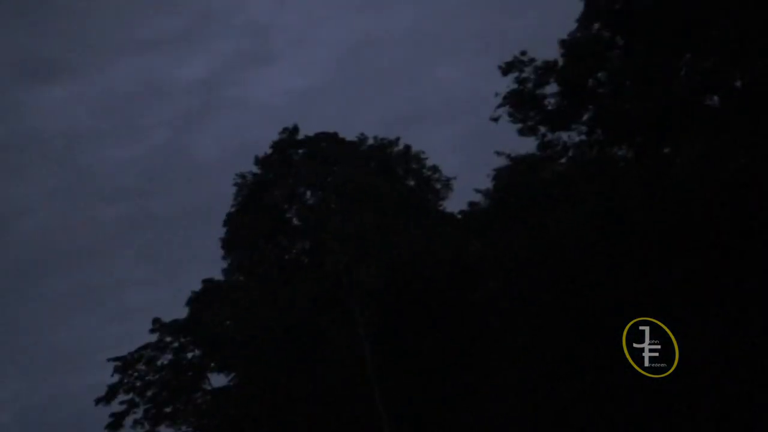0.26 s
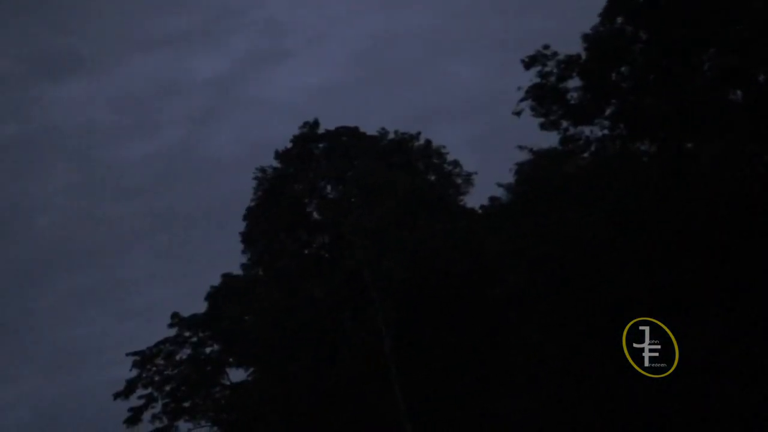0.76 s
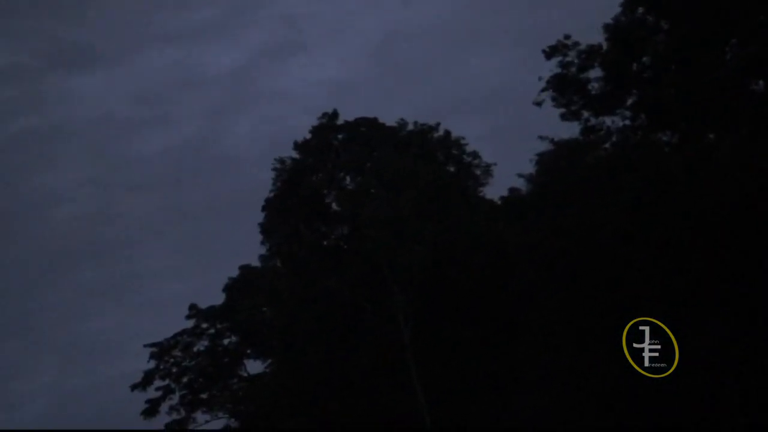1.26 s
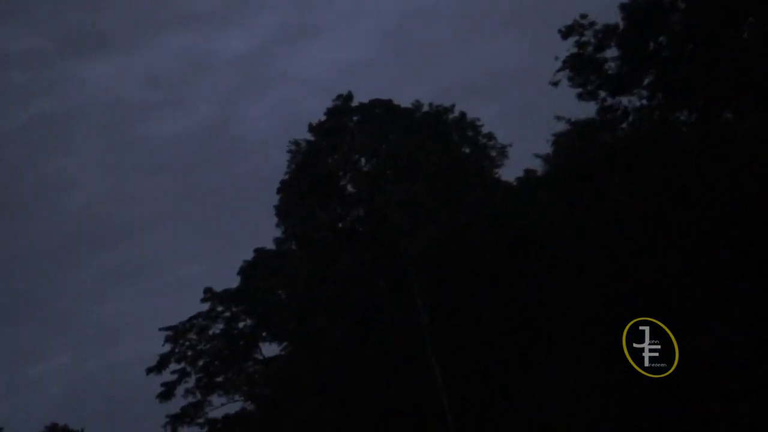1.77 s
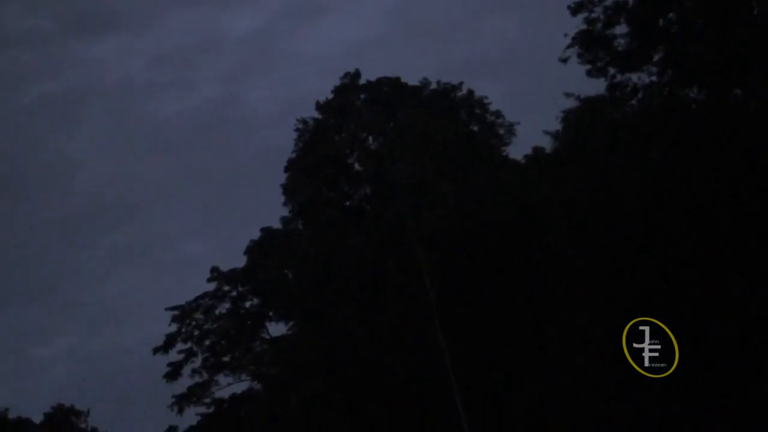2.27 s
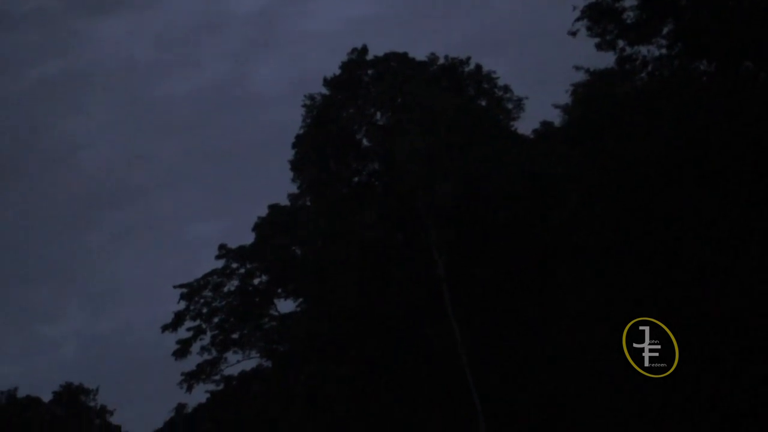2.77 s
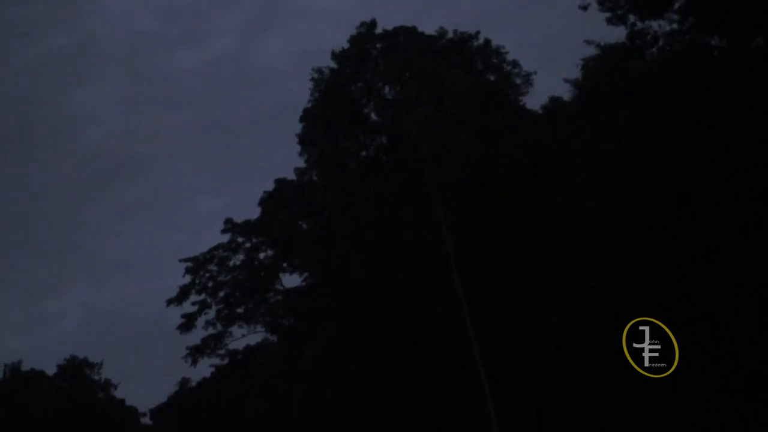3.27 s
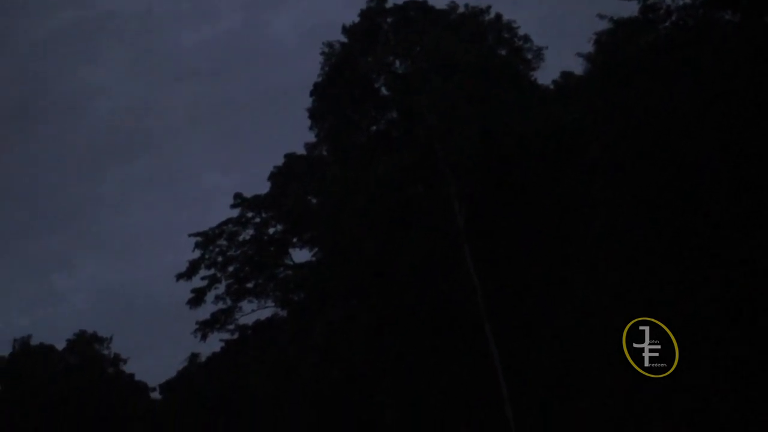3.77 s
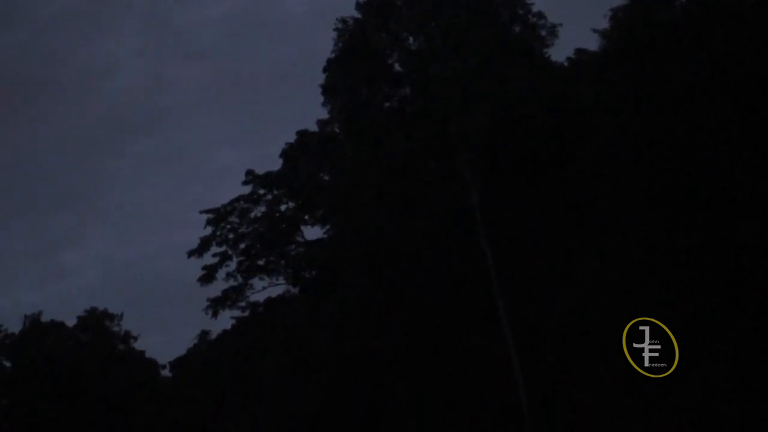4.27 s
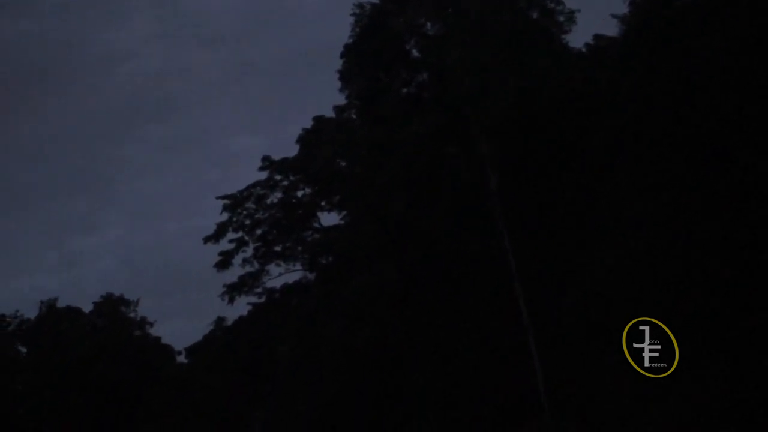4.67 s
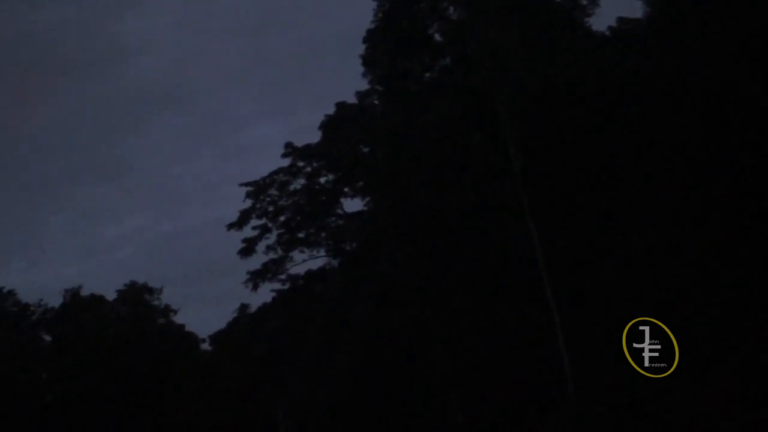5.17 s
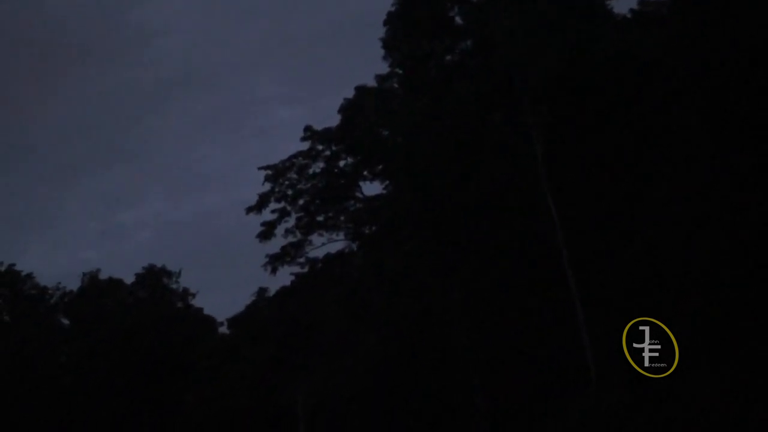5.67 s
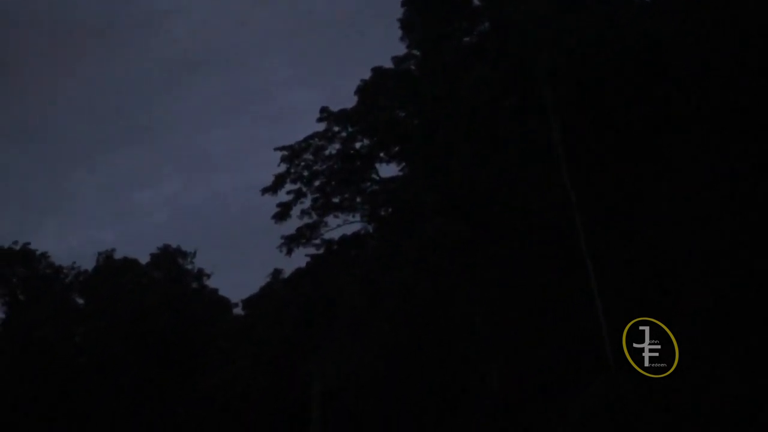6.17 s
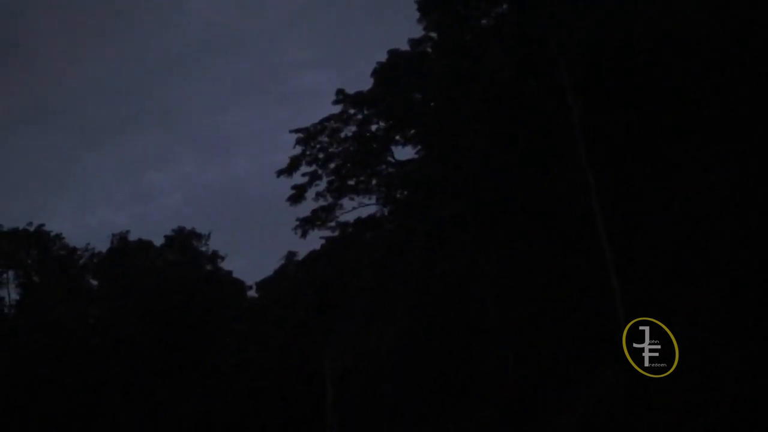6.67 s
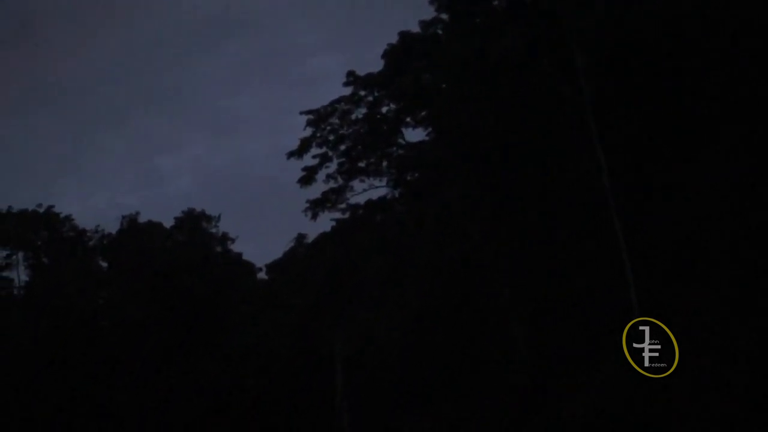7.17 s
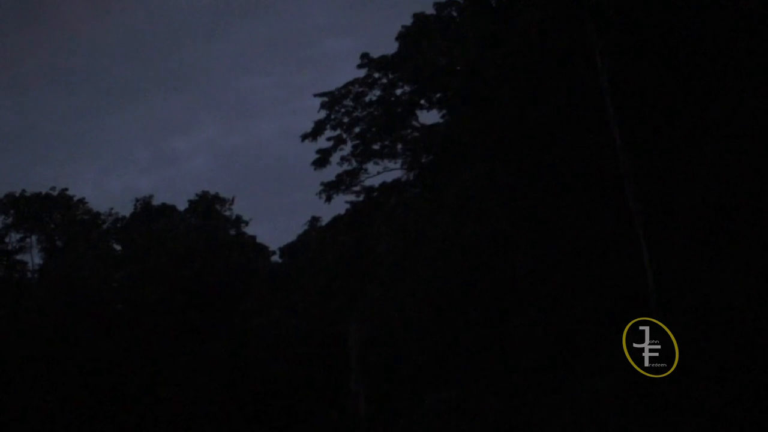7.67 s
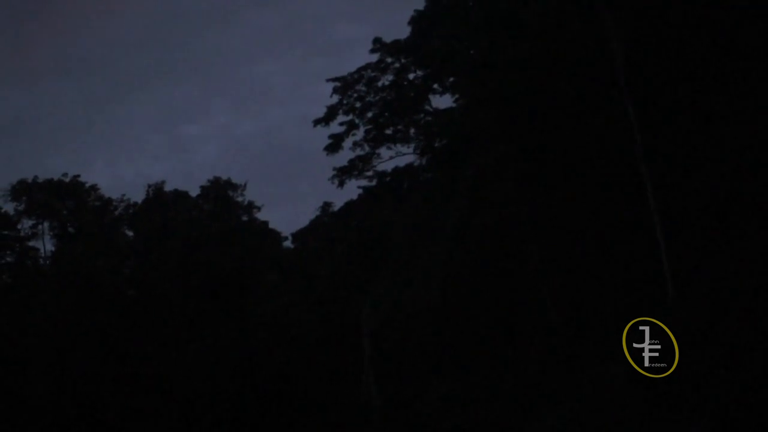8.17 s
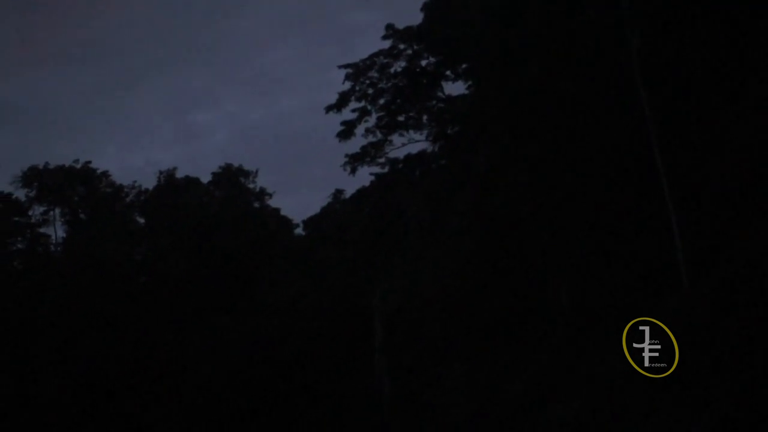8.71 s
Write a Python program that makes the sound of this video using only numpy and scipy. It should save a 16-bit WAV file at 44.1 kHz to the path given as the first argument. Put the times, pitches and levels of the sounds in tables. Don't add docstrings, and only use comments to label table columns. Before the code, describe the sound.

Far-off hoarse howling fades and barks twice in dark forest, while crickets and katydids trill ever nearer and drops tick on wet leaves.

```python
import sys
import numpy as np
from scipy import signal
from scipy.fft import rfft, irfft
from scipy.io import wavfile
from scipy.ndimage import uniform_filter1d

SR = 44100
rng = np.random.default_rng(int(sys.argv[2]) if len(sys.argv) > 2 else 0)


def bounce(signal):
    frames = np.transpose(np.atleast_2d(signal))
    limited = np.clip(frames, -1, 1)
    pcm = np.round(limited * 32767).astype(np.int16)
    wavfile.write(sys.argv[1], SR, pcm)


def boost_factor(decibels):
    exponent = np.asarray(decibels, float) / 20
    return 10 ** exponent


N = 394254
TIME = np.arange(N) / SR
FREQ = np.maximum(np.fft.rfftfreq(N, 1 / SR), 1)
FAR_ENDS_S = 6.21

# start_s, effort_db, opening_0_to_1, held_voice_above_effort_db
ROAR = [
    (0, -33, 0.56, -2.5),
    (.24, -31.5, 0.62, -5),
    (.5, -28, 0.63, -15.5),
    (.88, -27, 0.67, -4),
    (.97, -29, 0.3, -12.5),
    (1.32, -34, 0.34, -4.5),
    (1.38, -35.5, 0.46, -3.5),
    (1.65, -38.5, 0.27, -5.5),
    (2.2, -56, 0.4, 3.5),
]
# multiple, level_db
VOICE_ORDERS = [(1, 0), (2, -4), (3, -13), (4, -20), (5, -19)]
# pitch_hz, width_hz, level_db
HOARSE_THROAT = [(378, 146, -16.5), (683, 175, -8), (888, 88, -3), (1374, 260, -15.5)]
# pitch_hz, width_hz, level_db
BRIGHT_THROAT = [(1357, 31, 0), (1620, 380, -4), (1830, 35, -6), (1940, 200, -22), (2334, 140, 2.5)]
# pitch_hz, width_hz
MOUTHS = (1082, 50), (770, 50)
# start_s, length_s, level_db, pitch_hz, width_hz
JOINERS = [
    (.82, .52, -48, 1420, 180),
    (0.72, 0.58, -44, 770, 45),
    (1.38, 0.27, -53.5, 1965, 72),
    (1.47, 0.36, -64, 1360, 58),
    (.68, 0.32, -56, 2330, 60),
    (.45, 0.4, -53, 980, 69),
]
# start_s, length_s, level_db
CHEST = (0, 1.77, -60)
# pitch_hz, level_db_per_hz
MURMUR = [(15, -66.5), (25, -28), (146, -8.5), (280, 0), (316, -3.5), (493, -1.5), (626, -6), (756, -4.5),
          (1500, -15), (1950, -41), (3300, -120)]
# pitch_hz, level_db_per_hz
HISS = [(1000, -4.5), (2000, 2), (3000, -7), (4100, 3.5), (4800, -15.5), (7000, 9), (7900, 3.5),
        (8300, -11), (15500, -14)]
# pitch_hz, level_db_per_hz
BED = [(30, -26.5), (70, -21.5), (130, -20), (1200, -7.5), (1900, -5.5), (4100, -2), (5000, 5.5),
       (7000, 5.5), (7650, -18), (11000, -12), (15500, -19.5)]
# pitch_hz, likeness_-1_to_1
LIKENESS = [(60, -0.072), (180, -0.22), (550, -0.036), (1650, -0.15), (4970, 0.22), (15000, 0.26)]
# start_s, length_s, level_db
LULL = (6.215, 1.735, -11)
# pitch_hz, width_hz, level_db
FAR_KINDS = [(5020, 69, -15.5), (5640, 380, 2.5), (6150, 254, 2.5), (6592, 88, -4.5)]
# start_s, peak_db, pitch_hz
KNOCKS = [
    (0.547, -45, 167),
    (5.738, -60.5, 244),
    (5.917, -47, 130),
]
# start_s, length_s, level_db
CRICKET = [
    (6.01, 0.11, -51),
    (6.12, 0.11, -55),
    (6.25, .2, -51.5),
    (6.45, .12, -62),
    (6.69, 0.094, -55),
    (6.79, 0.13, -58),
    (8.66, 0.34, -63),
]
# start_s, peak_db, pitch_hz, left_minus_right_db, t60_s
PEEPS = [(3.3378, -36.5, 4700, -9, 0.5), (3.5229, -40, 4880, -6, 0.23), (4.9367, -37, 4980, 11, 0.3),
         (4.9994, -42, 5070, 10, 0.4), (5.8766, -33, 4800, 7, 0.26), (6.0168, -33, 4710, -12, 0.38),
         (7.2708, -32.5, 4620, 2, 1), (7.7994, -43, 4600, -1, 0.34), (8.401, -32, 4890, 2.0, 0.26),
         (8.6418, -38, 4830, 19, 0.22), (8.7126, -49, 5100, 7, 0.3), (9.9, -35, 5700, -0.5, 0.08),
         (6.4762, -29.5, 3470, 5, 0.09), (6.735, -36, 4500, 3.0, 0.08), (2.3, -46, 4870, 0, .2),
         (1.15, -44.5, 7500, 0.5, .9), (4.3, -43, 4300, 8, .3)]
# start_s, length_s, level_db, low_hz, high_hz
BUZZES = [
    (1.293, 0.22, -51.5, 4000, 4930),
    (1.64, 0.26, -50.5, 4380, 5050),
    (2.01, 0.2, -47.5, 4440, 4980),
    (2.39, .16, -50, 4130, 4900),
]
# start_s, peak_db, pitch_hz
FROGS = [(2, -49, 2370), (2.049, -38.5, 1656), (2.0894, -57, 1660), (2.3694, -44, 1960),
         (2.6952, -42, 1650), (2.8, -43, 1880), (3.012, -37.5, 1693), (3.04, -41, 1695),
         (3.0589, -43, 2010), (3.1363, -35.5, 1720), (3.162, -36.5, 2080), (3.212, -40, 1834),
         (3.2968, -36.5, 2050), (3.288, -36.5, 1767), (3.3494, -42, 1870), (3.4194, -46, 2010),
         (3.499, -46, 1756), (3.54, -42, 1756), (4.9907, -47, 1246), (5.005, -44, 1580), (5.03, -42, 1690),
         (5.1098, -46, 1560), (5.152, -39.5, 1730), (5.2195, -45, 1735)]
# start_s, air_sac_db, mouth_db
BARKS = [
    (2.278, -35.5, -37),
    (3.438, -38, -39.5),
]
# start_s, peak_db, pitch_hz, left_minus_right_db
DROPS = [(3.401, -34, 3670, -10), (3.531, -29.5, 4650, -6), (3.691, -36, 3140, -17),
         (3.712, -41, 3400, -13), (4.931, -36, 4030, -6), (4.986, -24.5, 4340, -9),
         (5.3163, -36, 4000, -10), (5.359, -39, 3610, -10), (5.442, -35, 3830, 8), (5.5079, -35, 3620, -13),
         (5.786, -46, 4040, -5.5), (6.86, -39, 3420, 0), (7.266, -38, 3540, -6), (7.301, -31, 4100, -11),
         (7.3634, -33.5, 4040, 6.5), (7.5372, -36, 4400, 1), (7.659, -39.5, 3800, -8),
         (7.949, -44, 3340, -7.0), (7.9776, -43, 3440, -15), (8.1865, -42.5, 3500, -23),
         (8.2105, -35, 3520, -17), (8.462, -43, 3780, -12), (8.527, -41, 4230, -7), (8.704, -44, 3460, -12),
         (8.7307, -41, 3830, -11)]
# start_s, peak_db, pitch_hz, left_minus_right_db
BIG_DROPS = [(5.259, -48, 2800, -13), (5.4, -52.5, 960, 5), (5.749, -52, 1450, -1.5),
             (6.008, -47, 1910, -9), (6.358, -46.5, 1890, -13), (6.921, -48.5, 2670, -1),
             (7.044, -55, 1350, 6), (7.086, -45, 2560, -6), (7.104, -46, 2200, 13), (7.186, -53, 1760, 4),
             (7.327, -51, 1080, -15), (7.392, -44.5, 2400, -4), (7.471, -44, 2940, -15),
             (7.598, -56, 1700, -8), (7.764, -55, 2500, -10), (7.85, -48, 2600, 5.5),
             (7.868, -48.5, 1590, 9), (7.887, -57, 1130, 2), (7.898, -50, 1650, 7),
             (8.047, -41.5, 2210, 21), (8.122, -43, 2460, -19), (8.143, -53.5, 1160, -7),
             (8.75, -42.5, 3000, -16)]
# start_s, peak_db, pitch_hz, left_minus_right_db
FAINT_DROPS = [(3.2929, -49, 4280, -6.5), (3.3144, -40, 4080, -3.0), (4.024, -40, 3710, 4.0),
               (4.1654, -39, 3980, 7), (5.3038, -49, 2720, -11), (5.3418, -50, 3520, -6.0),
               (5.4096, -42, 3460, -2.5), (5.4705, -40, 3860, -2.0), (6.5263, -43, 3530, -5),
               (6.5824, -46, 3620, -3.0), (7.087, -42, 3340, -5), (7.644, -42, 3500, -3.5),
               (7.7637, -49, 4060, -4), (8.0354, -39, 3970, -3)]
# start_s, peak_db, pitch_hz, left_minus_right_db
FAINT_LOW_DROPS = [(6.315, -55, 1730, -3.5), (6.528, -53, 2000, -4.5), (6.593, -58, 1960, -7),
                   (6.656, -57, 1910, -1), (6.708, -56, 1720, -3.5), (7.019, -58, 1930, -1.0),
                   (7.364, -57, 2330, -4.5), (7.459, -53, 1820, -6.0), (7.498, -58, 1300, -5.0),
                   (7.544, -53, 2260, -4.0), (8.202, -47, 2310, -6.0), (8.282, -58, 2260, 1.0)]
# start_s, peak_db, left_minus_right_db
TICKS = [(3.4004, -38, -1.5), (3.5213, -39.5, -1.5), (3.6964, -41, 0.0), (3.7903, -31, 2),
         (4.243, -46, 0.0), (5.2978, -44, -2.5), (5.3143, -47, -2.0), (5.3575, -37, -4.0),
         (5.4395, -44, -1.0), (5.506, -32, -6), (5.6121, -39, -3.0), (5.7942, -48, -1.0),
         (5.8106, -49, -2.0), (6.7226, -54, -1.0), (6.8079, -49, -0.5), (7.0498, -43, -2.0),
         (7.1995, -44, 1.5), (7.3022, -38, 9), (7.3262, -37, -2.5), (7.3347, -43.5, -4), (7.3631, -36, 2.5),
         (7.4709, -38, -6), (7.5656, -47, -2.0), (7.5856, -43.5, 0), (7.6519, -40, -1.0), (7.6749, -52, -2),
         (7.7567, -42, -0.5), (7.8999, -46, -1.5), (7.9622, -41.5, 7), (8.046, -42, -3.0),
         (8.0625, -42, -9), (8.0939, -43.5, -10), (8.1164, -37, -8.5), (8.1713, -44.5, 8),
         (8.2017, -45, 5.5), (8.2246, -41, 6.0), (8.3733, -50, -6.0), (8.6018, -46, -2.0),
         (8.6871, -43, -10), (8.7534, -41, -13), (8.7933, -45, 5.0), (8.8582, -42, 8)]
# centre_s, half_length_s, level_db, low_hz, high_hz
RUSTLES = [
    (8.055, 0.33, -55.5, 1510, 4500),
    (4.1, 0.5, -50, 2200, 10100),
    (4.794, 0.93, -55, 3330, 3600),
    (5.45, 0.19, -52.5, 700, 11300),
    (6.921, 0.025, -61.5, 400, 1500),
    (7.849, 0.006, -52, 301, 2000),
    (7.878, 0.024, -60, 705, 2800),
]
LOW_KIND = 4550, 115, 44, -3
MIDDLE_KIND = 5510, 100, 57, -5
HIGH_KIND = 6270, 120, 66, -3
# start_s, length_s, level_db
LOW_SONG = [
    (3.6, 0.58, -55),
    (4.2, 0.4, -57.5),
    (4.62, 0.48, -55),
    (5.4, 0.72, -54),
    (6.2, 0.97, -53),
    (7.2, 0.82, -54),
    (8.05, 0.83, -55.5),
]
# start_s, length_s, level_db
MIDDLE_CHIRPS = [(3.64, 0.11, -38.5), (3.95, 0.23, -42.5), (4.21, .13, -44), (4.43, 0.24, -41.5),
                 (4.8, 0.25, -44), (5.15, 0.16, -42), (5.47, 0.27, -43), (5.76, 0.49, -45.5),
                 (6.23, 0.13, -43), (6.5, 0.26, -39.5), (6.8, .2, -43), (7.15, 0.15, -38),
                 (7.36, 0.41, -46), (7.81, 0.13, -39), (8.02, 0.13, -36), (8.34, 0.22, -39),
                 (8.7, 0.19, -36.5)]
HIGH_CHIRPS_DB = [-47, -44, -45.5, -49, -40.5, -40.5, -43, -43.5, -44, -38.5, -38.5, -37.5, -42, -55, -40.5,
                  -39.5, -40, -40.5, -43.5, -45, -44, -60]
# low_hz, high_hz, from_s, to_s, rarity
DROPOUTS = [(7350, 7600, 6.1, 9, .5), (7600, 7950, 6.1, 9, .8), (7950, 8300, 6.1, 9, .9),
            (8300, 8600, 6.3, 9, 1.6), (8600, 8900, 6.3, 9, 1.8), (90, 200, 6.25, 7.95, .3),
            (200, 350, 6.25, 7.95, .5), (350, 520, 6.25, 7.95, .9), (520, 750, 6.25, 7.95, 1.3)]


def rms_one(x):
    return x / np.sqrt(np.mean(x ** 2) + 1e-20)


def in_time(rows):
    s, *columns = np.transpose(rows)
    return [np.interp(TIME, s, column) for column in columns]


def at_hz(points):
    hz, value = np.transpose(points)
    return np.interp(np.log(FREQ), np.log(hz), value)


def drift(rate_hz):
    knots = rng.standard_normal(int(N / SR * 400) + 1)
    r = np.exp(-2 * np.pi * rate_hz / 400)
    slow = signal.filtfilt([1], [1, -r], knots)
    return np.interp(TIME * 400, np.arange(len(slow)), rms_one(slow))


def pulses(per_s):
    return np.clip(np.sin(2 * np.pi * np.cumsum(per_s) / SR), 0, 1)


def band_noise(noise, order, low_hz, high_hz):
    band = signal.butter(order, [low_hz, high_hz], "band", fs=SR, output="sos")
    return rms_one(signal.sosfilt(band, noise))


def muffle(x, order, cutoff_hz):
    return signal.sosfilt(signal.butter(order, cutoff_hz, fs=SR, output="sos"), x)


def resonate(x, hz, width_hz):
    r = np.exp(-np.pi * width_hz / SR)
    poles = [1, -2 * r * np.cos(2 * np.pi * hz / SR), r * r]
    return signal.lfilter([(1 - r * r) / 2, 0, (r * r - 1) / 2], poles, x + 1e-18)


def throat(source, modes):
    out = 0
    for hz, width_hz, db in modes:
        ring = resonate(resonate(source, hz, width_hz), hz, 2 * width_hz)
        out = out + boost_factor(db) * rms_one(ring)
    return out


def folds(per_s, jitter, breath):
    slap_count = np.floor(np.cumsum(per_s * np.exp(jitter * drift(40))) / SR)
    slaps = np.diff(slap_count, prepend=0)
    return rms_one(slaps * boost_factor(3 * drift(81))) + breath * rng.standard_normal(N)


def scatter(x, t60, wet):
    spray = rng.standard_normal(SR // 2) * boost_factor(-60 * TIME[:SR // 2] / t60)
    echoes = signal.fftconvolve(x, spray / np.linalg.norm(spray))[:N]
    return np.sqrt(1 - wet) * x + np.sqrt(wet) * echoes


def pan(x, lr_db):
    return x * boost_factor([[lr_db / 2], [-lr_db / 2]])


def add_ping(out, s, peak_db, hz, t60, lr_db, rise_s):
    t = TIME[:int(t60 * SR)]
    wave = np.sin(2 * np.pi * hz * t) * boost_factor(peak_db - 60 * t / t60) * (1 - np.exp(-t / rise_s))
    at = round(s * SR)
    wave = pan(wave, lr_db)[:, :N - at]
    out[:, at:at + wave.shape[1]] += wave


def phrases(rows, attack, release):
    t = TIME[::64]
    gain = 0
    for s, length, db in rows:
        edges = np.minimum((t - s) / attack, (s + length - t) / release)
        gain = gain + boost_factor(db) * np.clip(edges + .5, 0, 1)
    return np.interp(TIME, t, gain)


def fading(db, from_s, db_per_s):
    return boost_factor(db - db_per_s * np.maximum(TIME - from_s, 0)) * (TIME < FAR_ENDS_S)


def held_voice():
    turn = 2 * np.pi * np.cumsum(458 * (1 + .02 * drift(30) + .004 * drift(2))) / SR
    gasps_db = -9.0 * np.clip(drift(12) - .4, 0, 2)
    voice = 0
    for multiple, db in VOICE_ORDERS:
        flutter_db = 1.5 + 3 * np.clip(drift(48), -3, 1.2)
        voice = voice + boost_factor(db + gasps_db + flutter_db) * np.sin(multiple * turn)
    return voice


def rasp(effort_db, opening):
    effort, source = boost_factor(effort_db), folds(170, jitter=.4, breath=1.3)
    bright_db = -35 - 11 + 0.89 * (effort_db + 32.5)
    bright = throat(source, BRIGHT_THROAT[:-1]) + opening * throat(source, BRIGHT_THROAT[-1:])
    out = boost_factor(bright_db - 7) * bright + effort * throat(source, HOARSE_THROAT)
    for (hz, width_hz), share in zip(MOUTHS, (opening, 1 - opening)):
        out += effort * share * throat(source, [(hz, width_hz, -1)])
    for s, length, db, hz, width_hz in JOINERS:
        gain = phrases([(s, length, db)], attack=0.056, release=0.1)
        out += gain * throat(source, [(hz, width_hz, 0)])
    waver = drift(6)
    waver -= uniform_filter1d(waver, size=SR // 2)
    return np.interp(np.arange(N) + .012 * np.cumsum(waver), np.arange(N), out)


def roar():
    effort_db, opening, held_db = in_time(ROAR)
    held = boost_factor(effort_db + held_db) * held_voice() * np.clip((2.3 - TIME) / 0.15, 0, 1)
    rough = rasp(effort_db, np.clip(opening, 0, 1)) * np.clip((2.05 - TIME) / 0.46, 0, 1)
    chest_gain = fading(-69, from_s=4.7, db_per_s=1.7) + phrases([CHEST], attack=1.5, release=0.15)
    chest = chest_gain * throat(rng.standard_normal(N), [(155, 70, 0.0015)])
    return scatter(muffle(held + rough, 8, 2550), t60=.3, wet=.12) + chest


def hush():
    murmur, hiss = [rms_one(irfft(rfft(rng.standard_normal(N)) * boost_factor(at_hz(c)), N)) for c in (MURMUR, HISS)]
    line = boost_factor(-23.5) * rms_one(resonate(rng.standard_normal(N), 8190, 30))
    low = fading(-50.5, from_s=2.81, db_per_s=4.43) * boost_factor(drift(1.4)) * murmur
    return low + fading(-48.5, from_s=3.87, db_per_s=2.7) * boost_factor(1.3 * drift(6)) * (hiss + line)


def air():
    mid, side = rfft(rng.standard_normal((2, N))) * boost_factor(at_hz(BED))
    alike = np.clip(at_hz(LIKENESS), -1, 1)
    mid, side = np.sqrt(1 + alike) * mid, irfft(np.sqrt(1 - alike) * side, N)
    low = 1 / (1 + (FREQ / 1200) ** 4)
    s, length, depth_db = LULL
    lull_db = depth_db * phrases([(s, length, 0)], attack=.04, release=.02)
    lull_db = lull_db * np.clip(1 + .5 * drift(17.0), .5, 2)
    mid = irfft(mid * low, N) * boost_factor(lull_db) + irfft(mid * (1 - low), N)
    return pan(boost_factor(-45.5 + .8 * drift(5)) * rms_one(mid + side * [[1], [-1]]), -2.1)


def far_singers():
    common, left, right = throat(rng.standard_normal((3, N)), FAR_KINDS)
    lean = boost_factor(np.clip(TIME - 2.5, 0, 2) * [[-.6], [.6]])
    return lean * boost_factor(-39.5 + 1.3 * drift(4.2)) * rms_one(np.array([left, right]) + common)


def knocks():
    out = np.zeros((2, N))
    for s, db, hz in KNOCKS:
        for ratio in (1, 1.7):
            add_ping(out, s, db + 7.5, hz * ratio, t60=0.097, lr_db=0, rise_s=0.0041)
    return out[0]


def cricket_and_peeps():
    note = np.sin(2 * np.pi * np.cumsum(3340 + 25 * drift(30)) / SR) * (.8 + .3 * drift(25))
    note *= 0.62 + 0.44 * pulses(52 * (1 + .1 * drift(7.8)))
    out = pan(note * boost_factor(7.0) * phrases(CRICKET, attack=0.025, release=0.051), .5)
    for s, db, hz, lr_db, t60 in PEEPS:
        add_ping(out, s, db - 4.0, hz, t60, lr_db, rise_s=0.0066)
    out *= .8 + .5 * drift(40)
    return np.array([scatter(side, t60=0.16, wet=0.42) for side in out])


def buzzes():
    strokes = 0.73 + pulses(68 * (1 + 0.106 * drift(10)))
    noise, out = rng.standard_normal(N), 0
    for s, length, db, low_hz, high_hz in BUZZES:
        gain = phrases([(s, length, db)], attack=.012, release=0.11)
        out += gain * band_noise(noise, 3, low_hz, high_hz)
    return out * strokes


def frogs():
    croaks = np.zeros((2, N))
    for s, db, hz in FROGS:
        for ratio, less_db in ((1, 6.0), (.85, -2), (0.86, -4.5), (1.15, -2.0), (1.1, -9)):
            add_ping(croaks, s, db + less_db, hz * ratio, t60=.13, lr_db=0, rise_s=.014)
    husk = .8 + .8 * drift(65)
    husk /= np.sqrt(uniform_filter1d(husk ** 2, size=1200))
    return scatter(croaks[0] * husk, t60=.45, wet=.55)


def bark_gain(s, db, echo_db, db_per_s):
    after = np.maximum(TIME - s - 0.12, 0)
    rise = np.clip((TIME - s) / 0.041, 0, 1)
    return rise * boost_factor(db + echo_db * np.clip(after / 0.13, 0, 1) - db_per_s * after)


def barks():
    source, out = folds(85, jitter=.3, breath=1.1), 0
    echo, sac_hz = rng.standard_normal(N), 322
    for s, sac_db, mouth_db in BARKS:
        direct = np.clip(1 - (TIME - s - .17) / 0.06, 0, 1)
        sac = direct * throat(source, [(sac_hz, 32, -1.5), (240, 110, -4)])
        sac += (1 - direct) * throat(echo, [(sac_hz, 24, -1.5), (250, 120, -9)])
        mouth = direct * throat(source, [(700, 70, -1), (635, 45, -5), (770, 60, -5)])
        mouth += (1 - direct) * throat(echo, [(631, 67, 0.5), (773, 35, -10)])
        out += bark_gain(s, sac_db, echo_db=-5.5, db_per_s=19) * sac
        out += bark_gain(s + 0.013, mouth_db, echo_db=-8, db_per_s=23) * mouth
    return scatter(muffle(out, 4, 960), t60=.15, wet=.1)


def drops():
    out = np.zeros((2, N))
    leaf_modes = ((0.986, 2.5, 55.5), (0.905, 2.0, 33.0), (0.48, -19, 27), (0.47, -24, 6.3), (0.83, -8, 9.0))
    for s, db, hz, lr_db in DROPS + BIG_DROPS + FAINT_DROPS + FAINT_LOW_DROPS:
        for ratio, less_db, cycles in leaf_modes:
            add_ping(out, s, db + less_db, hz * ratio, cycles / hz, lr_db, rise_s=.0006)
        for crack_hz in (1500, 2300, 3200, 4240):
            add_ping(out, s, db - 7.5, crack_hz * rng.uniform(0.79, 1.2), 0.0042, lr_db, rise_s=0.00041)
    return out


def ticks():
    out = np.zeros((2, N))
    for s, db, lr_db in TICKS:
        for hz, less_db in ((8900, 3.0), (10000, 0.0), (11500, -6), (13500, -12)):
            add_ping(out, s, db + less_db, hz * rng.uniform(0.99, 1.05), 0.0048, lr_db, rise_s=0.00027)
    return out


def trillers(hz, spread_hz, per_s, lr_db, overtone_db, sustain=0.73):
    close = 0
    for place in (-1, 0, 1):
        turn = 2 * np.pi * np.cumsum(hz + spread_hz * (place + .4 * drift(1.5)) + 25 * drift(25.12)) / SR
        beat = 2 * np.pi * np.cumsum(per_s * (1 + .03 * place + 0.0192 * drift(2.79))) / SR
        stroke = np.clip(sustain + np.sin(beat + 6.3 * rng.random()), 0, 1) * boost_factor(4.5 * drift(4))
        overtone = boost_factor(overtone_db) * np.sin(2 * turn + 0.81 * drift(90))
        song = stroke * (np.sin(turn) + (place == 1) * overtone)
        both = np.array([scatter(song, t60=.1, wet=.4), scatter(song, t60=.1, wet=.4)])
        close = close + pan(both, lr_db + 2.5 * place)
    return close / np.sqrt(uniform_filter1d(np.mean(close ** 2, axis=0), size=6000))


def near_insects():
    high_chirps = [(3.635 + k * .2478, 0.18, db) for k, db in enumerate(HIGH_CHIRPS_DB)]
    between = [(3.6, 6, -52.5)]
    middle, high = [phrases(rows + between, attack=0.067, release=0.067) for rows in (MIDDLE_CHIRPS, high_chirps)]
    low = phrases(LOW_SONG, attack=.15, release=.1)
    out = boost_factor(5.0) * low * trillers(*LOW_KIND, overtone_db=-47, sustain=.8)
    out += boost_factor(-1.0) * middle * trillers(*MIDDLE_KIND, overtone_db=-21.0)
    return out + boost_factor(1.7) * high * trillers(*HIGH_KIND, overtone_db=-38)


def rustles():
    out = np.zeros((2, N))
    for s, half, db, low_hz, high_hz in RUSTLES:
        grains = rng.standard_normal((2, N)) * boost_factor(3.3 * drift(60))
        out += boost_factor(db) * band_noise(grains, 2, low_hz, high_hz) * np.exp(-((TIME - s) / half) ** 2)
    return out


def scene():
    far = roar() + hush() + knocks() + buzzes() + frogs() + barks()
    around = air() + far_singers() + cricket_and_peeps() + near_insects()
    return far + around + drops() + ticks() + rustles()


def band_limit(x):
    return signal.sosfilt(signal.butter(12, 15710, fs=SR, output="sos"), x)


def record(dry):
    mid, shared = rfft(dry.mean(axis=0)), drift(9)
    for low_hz, high_hz, from_s, to_s, rarity in DROPOUTS:
        chance = uniform_filter1d(.85 * shared + .85 * drift(12), size=900)
        gone = (chance > rarity) & (TIME > from_s) & (TIME < to_s)
        band = irfft(mid * (FREQ >= low_hz) * (FREQ < high_hz), N)
        dry = dry - uniform_filter1d(gone * 1., size=400) * band
    return band_limit(dry)


dry = scene()
out = record(dry)
bounce(out)
```